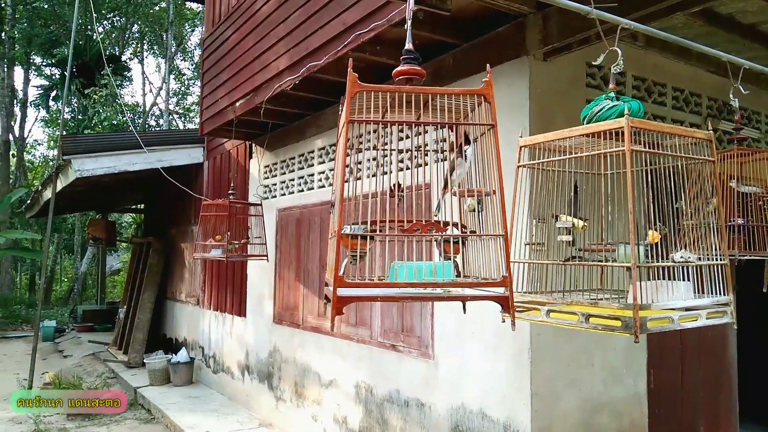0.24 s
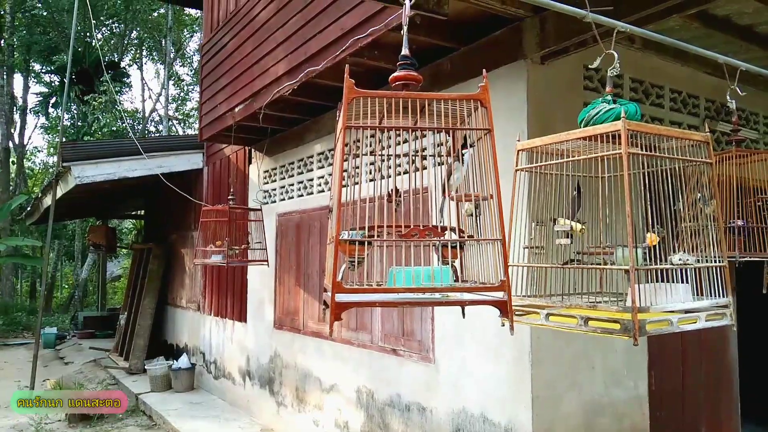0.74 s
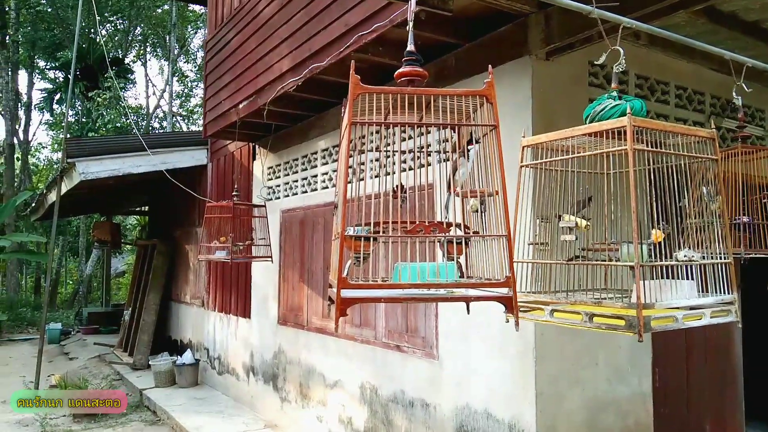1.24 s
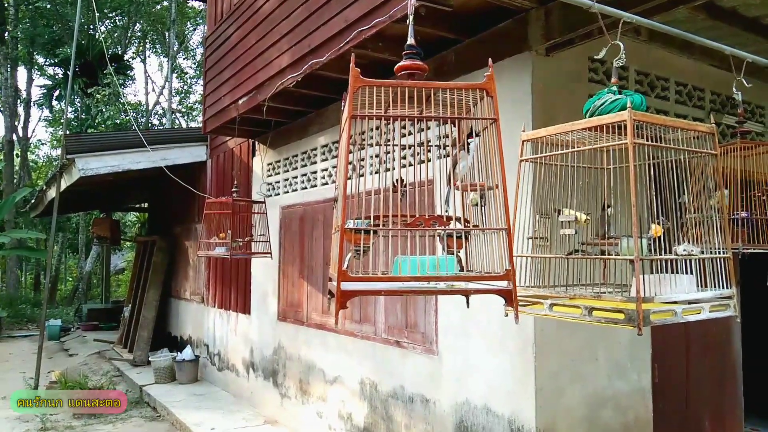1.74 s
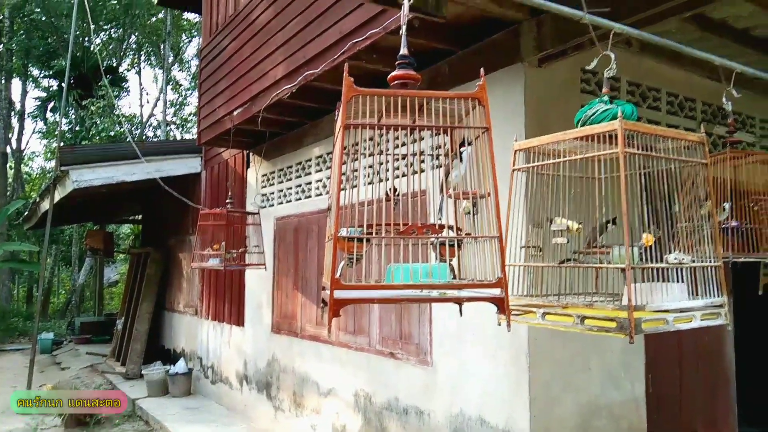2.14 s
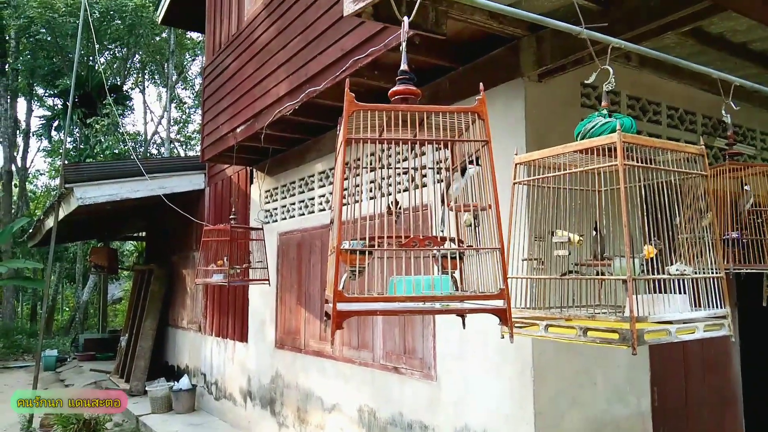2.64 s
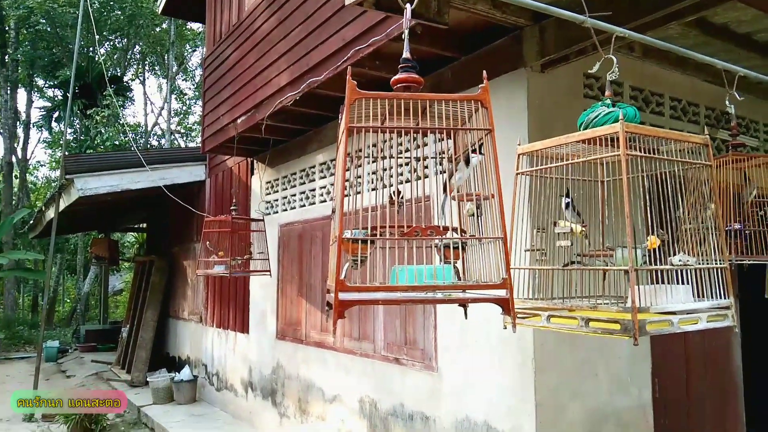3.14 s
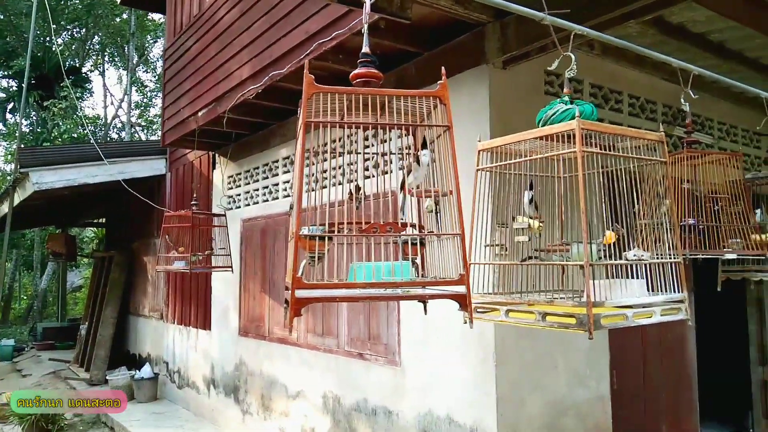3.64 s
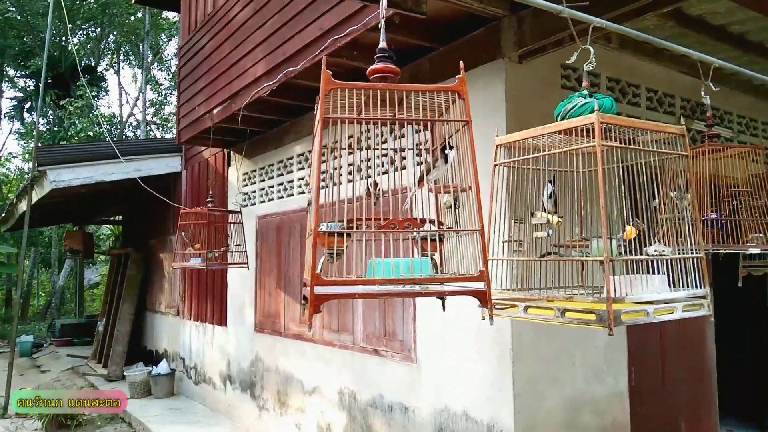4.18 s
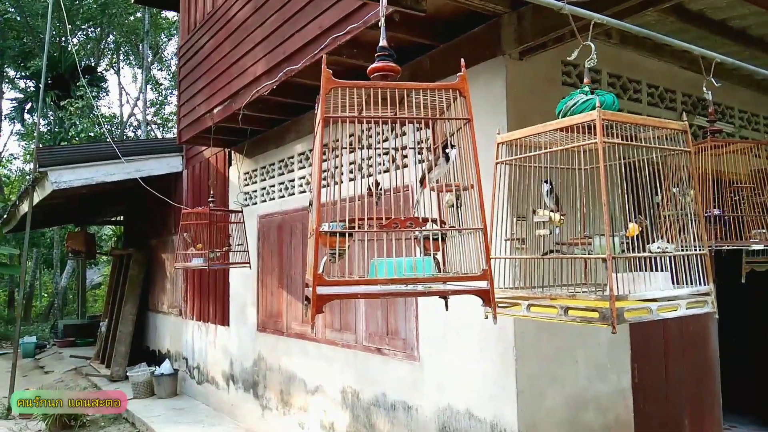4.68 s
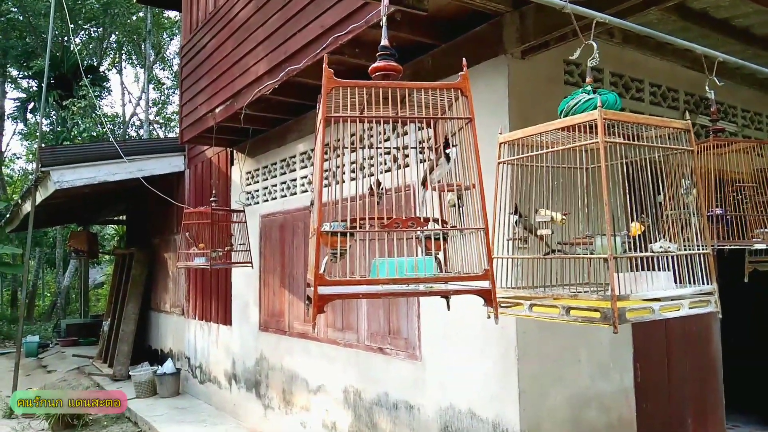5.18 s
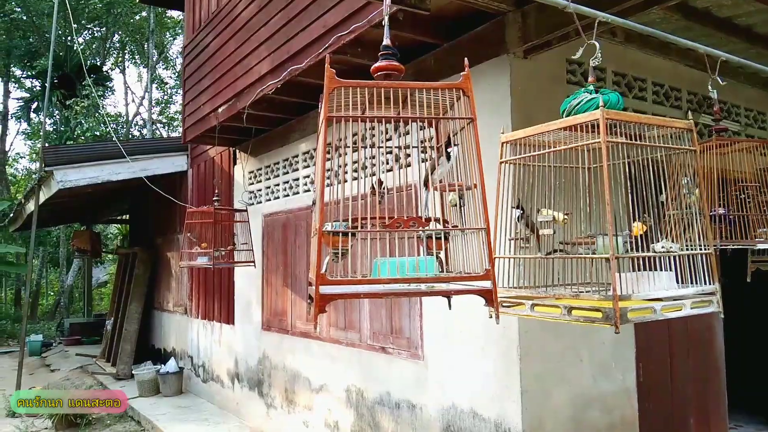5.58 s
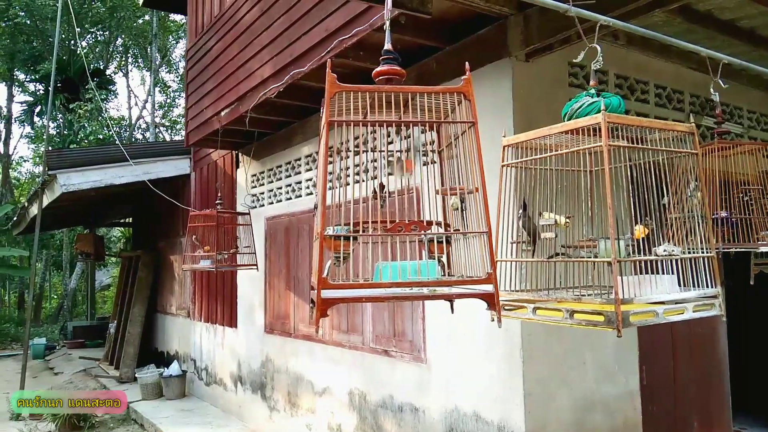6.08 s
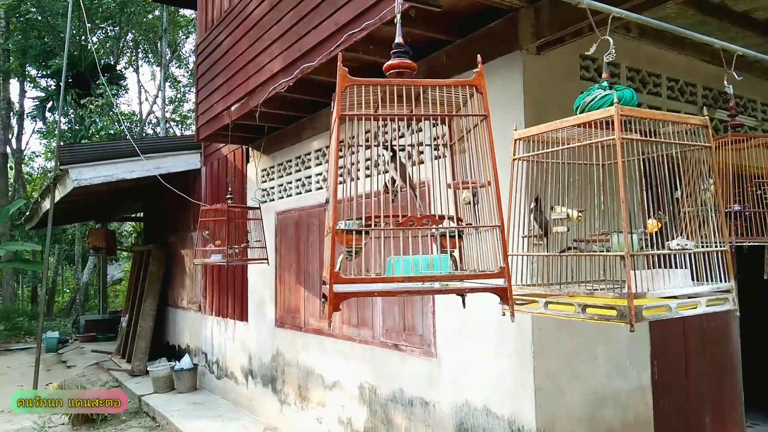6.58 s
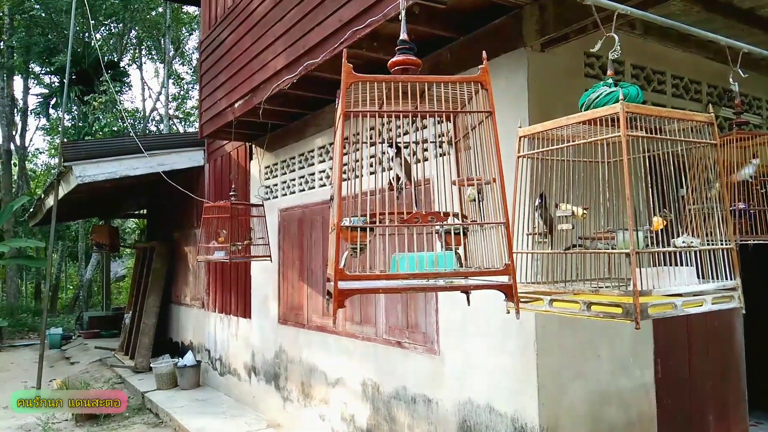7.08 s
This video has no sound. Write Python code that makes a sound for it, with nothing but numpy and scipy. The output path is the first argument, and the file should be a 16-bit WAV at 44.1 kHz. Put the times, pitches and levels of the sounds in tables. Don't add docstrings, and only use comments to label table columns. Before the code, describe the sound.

Bulbuls chatter in liquid whistles and short rasping chirps outdoors, over low traffic rumble that grows into the broad hiss of an approaching car.

```python
import sys
import numpy as np
from scipy import signal
from scipy.io import wavfile
from scipy.ndimage import uniform_filter1d

SR = 44100
rng = np.random.default_rng(int(sys.argv[2]) if len(sys.argv) > 2 else 0)


def master(y):
    cut = np.clip(np.atleast_2d(y).T, -1, 1)
    pcm = np.round(cut * 32767)
    wavfile.write(sys.argv[1], SR, pcm.astype(np.int16))


def gain_from_db(level_db):
    decades = np.asarray(level_db, float) / 20
    return 10 ** decades


N = 322812

# time_s, tyre_roar_db (its nearness), throttle_db, road_bumps_db, road_coarseness_db
CAR_APPROACH = [(0.0, -55.5, 0, -2, 3.5), (.9, -56.5, 3.5, -2, -5.5), (1.2, -57, 1.5, -4.5, -1.5),
                (1.6, -57.5, 1.5, -1, 18), (2.3, -52, 0, 2, 5.5), (3.1, -50, -2.5, -4, 9),
                (3.5, -49.5, -1.5, -5.5, 12.5), (4.0, -47.5, 3.5, 0.5, -2), (5.2, -42.5, 0, 2, 1),
                (5.6, -40, 1.5, 6, -5), (5.9, -38, 2.5, 4, -16), (6.24, -34, -5.5, -1.5, -8.5),
                (6.7, -30.5, 0, 0.5, -3.5), (7.32, -36.5, 0.5, -2.5, 0)]
# frequency_hz, level_db (per Hz)
THUD_COLOUR = [(15, -47), (25, -32.5), (74, -4.5), (125, 0), (160, -34), (280, -120)]
# frequency_hz, level_db (per Hz)
RUMBLE_COLOUR = [(74, -37.5), (125, 0), (204, 4.5), (275, -2.5), (330, -21), (430, -48.5), (730, -120)]
# frequency_hz, level_db (per Hz)
ROAR_COLOUR = [(180, -34), (300, -1.5), (365, -20.5), (398, 1), (511, -3), (625, 1), (930, -1.5),
               (1500, -22), (1950, -40), (3300, -120)]
# frequency_hz, level_db (per Hz)
HISS_COLOUR = [(760, -48), (1300, -5), (1770, -1.5), (2200, -9), (3200, 1), (3970, -3.5), (4890, -6.5),
               (5420, -11.5), (7950, -18.5), (9570, -17), (12000, -58.5), (15400, -54)]
# start_s, length_s, pitch_hz, level_db
FAR_WARBLE_NOTES = [(0.0, 0.1, 2650, -44.5), (0.0, 0.074, 2080, -53), (.24, 0.15, 3890, -56.5),
                    (.33, 0.21, 5500, -56.5), (.47, 0.037, 4330, -45.5), (.6, 0.039, 3950, -60),
                    (1.28, 0.19, 2110, -64), (1.43, 0.068, 3590, -60), (1.4, 0.065, 2900, -70),
                    (1.46, 0.046, 2450, -57), (1.29, 0.13, 2350, -70), (1.86, 0.092, 3640, -62),
                    (1.89, 0.083, 2373, -42), (2.26, 0.13, 2600, -40), (2.31, 0.23, 1843, -45),
                    (2.53, 0.08, 3600, -47), (2.5, 0.09, 4750, -62), (2.99, 0.035, 2000, -40),
                    (2.13, 0.1, 2700, -50), (6.29, 0.1, 2900, -42), (2.98, 0.027, 1663, -24.5),
                    (3.02, 0.048, 3910, -49), (3.23, 0.27, 5200, -64), (3.39, 0.024, 4500, -28.5),
                    (5.18, 0.068, 2120, -68.5), (7.03, 0.11, 3560, -43)]
# start_s, length_s, start_hz, end_hz, level_db
BUZZ_NOTES = [(.028, 0.04, 2564, 3272, -27.5), (.24, 0.046, 1850, 3090, -42.5),
              (.305, 0.067, 2145, 2484, -28.5), (.35, 0.045, 3254, 3462, -18),
              (.475, 0.041, 2990, 3092, -20), (.588, 0.016, 3260, 3290, -12.5),
              (.635, 0.054, 2160, 2200, -26.5), (1.724, 0.037, 2575, 3186, -22),
              (2.255, 0.077, 3360, 2990, -36), (4.468, 0.019, 2140, 2440, -19),
              (4.83, 0.046, 2930, 2976, -22.5), (4.85, 0.035, 3526, 3684, -20),
              (5.302, 0.094, 2832, 3696, -17.5), (5.568, 0.038, 2650, 3600, -21),
              (5.61, 0.047, 3534, 3200, -37), (5.61, 0.071, 3120, 1970, -24),
              (5.778, 0.084, 2335, 3478, -19.5), (5.83, 0.086, 3070, 3080, -31.5),
              (6.428, 0.025, 2850, 3550, -25), (6.445, 0.05, 3500, 3850, -20),
              (7.0, 0.057, 3250, 3575, -28.5)]
# start_s, length_s, pitch_hz, level_db
LEVEL_NOTES = [(1.36, 0.036, 2960, -41), (6.295, 0.02, 3350, -36), (1.895, 0.045, 2200, -44),
               (.048, 0.085, 3200, -35), (.275, 0.046, 2095, -32), (1.42, 0.023, 2036, -31),
               (4.382, 0.033, 3020, -29), (4.53, 0.019, 3080, -29), (4.705, 0.023, 3092, -28),
               (1.455, 0.024, 2034, -39.5), (2.1, 0.044, 3290, -52.5), (1.875, 0.067, 1922, -42),
               (2.038, 0.048, 2993, -38), (2.38, 0.12, 2200, -37.5), (2.778, 0.093, 2283, -32.5),
               (2.905, 0.013, 1560, -29.5), (3.04, 0.15, 2556, -43), (3.535, 0.079, 3240, -30),
               (3.655, 0.049, 1985, -29), (4.1, 0.016, 3550, -22), (4.25, 0.057, 3220, -31),
               (2.165, 0.069, 2567, -42), (1.915, 0.079, 2997, -34), (6.228, 0.037, 2538, -22)]
# start_s, length_s, pitch_hz, level_db
LIFTING_NOTES = [(.082, 0.045, 1615, -36), (.287, 0.044, 1844, -35.5), (.51, 0.074, 1590, -40.5),
                 (2.065, 0.046, 1550, -39.5), (2.445, 0.045, 1516, -38), (2.725, 0.013, 1550, -31),
                 (3.07, 0.035, 2045, -33.5), (3.095, 0.034, 1753, -29.5), (3.255, 0.043, 2636, -31),
                 (3.96, 0.028, 3300, -11), (4.205, 0.052, 1894, -21), (4.885, 0.032, 3624, -11.5),
                 (5.538, 0.04, 2400, -25)]
# start_s, length_s, pitch_hz, level_db
SETTLING_NOTES = [
    (.605, 0.027, 2716, -22),
    (3.272, 0.04, 2870, -25),
    (4.055, 0.047, 2890, -16.5),
    (6.145, 0.0333, 3344, -19.5),
    (6.212, 0.022, 2550, -30),
]
# start_s, length_s, pitch_hz, level_db
ARCHING_NOTES = [
    (6.172, 0.04, 3574, -24),
]
# start_s, length_s, start_hz, end_hz, level_db
SLIDE_NOTES = [(1.375, 0.07, 1464, 1920, -43.5), (1.358, 0.0337, 1680, 1470, -41.5),
               (1.39, 0.031, 3090, 3770, -56), (1.48, 0.015, 3740, 2060, -36),
               (2.08, 0.023, 3060, 3340, -49), (2.476, 0.012, 2840, 2180, -22),
               (3.92, 0.041, 3020, 3024, -17), (4.028, 0.025, 2805, 2490, -18.5),
               (4.042, 0.0198, 2650, 2260, -14.5), (4.812, 0.022, 2830, 4060, -28),
               (4.97, 0.04, 2490, 2697, -33), (5.015, 0.02, 2880, 3150, -32.5),
               (5.065, 0.047, 2485, 2870, -29.5), (5.161, 0.0091, 3200, 1970, -19),
               (5.24, 0.04, 2440, 2690, -31), (5.272, 0.017, 2810, 3200, -34),
               (6.03, 0.016, 2800, 4080, -22), (6.045, 0.0213, 3137, 2810, -12),
               (6.258, 0.0194, 3160, 2490, -18.5), (6.912, 0.0327, 2680, 3320, -38),
               (6.945, 0.05, 2640, 2704, -33), (6.985, 0.025, 2480, 2130, -41),
               (7.025, 0.028, 1940, 1960, -34), (4.17, 0.014, 2180, 1800, -31),
               (4.243, 0.026, 3700, 4300, -41), (4.44, 0.016, 1870, 1750, -34),
               (1.425, 0.055, 3550, 3650, -62), (1.475, 0.025, 1920, 1450, -40),
               (7.16, 0.021, 1450, 1560, -37)]
# start_s, length_s, start_hz, end_hz, level_db
HOOK_NOTES = [(6.127, 0.022, 3000, 3900, -27), (6.318, 0.036, 2250, 1900, -34),
              (4.66, 0.045, 1450, 2750, -36), (.566, 0.028, 1900, 2480, -34),
              (1.711, 0.07, 1836, 2900, -32), (3.245, 0.034, 2017, 2625, -25),
              (3.935, 0.02, 1350, 2100, -24), (2.461, 0.015, 2310, 2940, -18),
              (4.058, 0.034, 1610, 2277, -26), (4.14, 0.04, 1310, 2100, -22.5),
              (4.283, 0.03, 1600, 2247, -22.5), (4.211, 0.0343, 2824, 3230, -19.5),
              (4.317, 0.037, 2233, 2416, -18.5), (4.41, 0.041, 1350, 1810, -24.5),
              (5.219, 0.021, 2810, 3900, -35), (6.105, 0.022, 1930, 2304, -19)]
# start_s, length_s, start_hz, end_hz, level_db
TREE_NOTES = [(.14, 0.078, 4950, 5430, -74.5), (.74, 0.095, 6050, 5800, -80), (.85, 0.13, 5680, 5300, -76),
              (.96, 0.14, 5400, 5000, -68), (1.065, 0.16, 5120, 4740, -61.5), (1.19, 0.21, 4764, 4690, -66),
              (.945, 0.046, 4080, 4240, -72), (.99, 0.045, 3970, 3850, -75.5),
              (1.04, 0.036, 4300, 4200, -85), (1.06, 0.038, 3800, 3800, -75.5),
              (1.17, 0.056, 2180, 2190, -76), (.915, 0.037, 4920, 4880, -70), (.945, 0.11, 2670, 2740, -77),
              (1.21, 0.048, 6200, 6160, -69), (1.29, 0.04, 3860, 3760, -60),
              (1.48, 0.33, 5950, 4970, -61.5), (1.59, 0.12, 4100, 3300, -55),
              (1.8, 0.15, 5070, 5080, -53.5), (1.9, .07, 4450, 4670, -63), (1.95, .12, 4500, 6550, -54.5),
              (2.085, 0.07, 6750, 5100, -59.5), (2.2, 0.1, 5600, 5230, -63), (2.27, 0.15, 5170, 5250, -67),
              (2.41, 0.064, 4530, 4560, -70), (2.78, 0.11, 4190, 4480, -71), (2.47, 0.13, 5400, 5260, -70),
              (3.02, 0.07, 5300, 5170, -67.5)]
# start_s, length_s, start_hz, end_hz, level_db
WARBLE_NOTES = [(2.53, .052, 2440, 2056, -37), (4.497, 0.0305, 3850, 4300, -27),
                (2.486, .052, 2100, 2927, -33), (2.535, 0.07, 2800, 3200, -41),
                (4.49, 0.06, 2400, 1950, -35), (2.872, 0.055, 3020, 3040, -29.5),
                (2.995, 0.09, 2300, 3300, -38), (3.03, 0.046, 3540, 3600, -42.5),
                (3.345, .1, 2076, 3472, -25), (3.5, 0.0415, 2644, 3330, -30),
                (3.606, 0.042, 2003, 2504, -23.5), (3.705, 0.072, 2300, 3300, -33),
                (3.768, 0.1, 1480, 3450, -24), (3.95, 0.013, 2360, 2650, -5),
                (4.183, 0.021, 2346, 2350, -17)]
# start_s, length_s, middle_hz, top_hz, level_db
RASP_NOTES = [
    (4.333, 0.084, 2695, 3120, -28),
    (4.477, 0.09, 2483, 3110, -28),
    (4.656, 0.084, 2825, 2970, -28.5),
    (4.845, 0.061, 3314, 3560, -28.5),
]
# start_s, length_s, start_hz, end_hz, level_db
FAR_RASP_NOTES = [
    (4.96, 0.11, 1807, 2774, -49.5),
    (5.22, 0.091, 1755, 2730, -53),
    (6.365, .035, 1900, 2920, -48),
]
# time_s, pitch_hz, level_db
LONG_WHISTLE = [
    (5.039, 1432, -36),
    (5.053, 1663, -31.5),
    (5.079, 1687, -36),
    (5.09, 2140, -23),
    (5.109, 2223, -15.5),
    (5.118, 2093, -24.5),
    (5.126, 1770, -33),
    (5.137, 2104, -24.5),
    (5.158, 2240, -15.5),
]
# multiple (of the pitch), level_db
WHISTLE_OVERTONES = [(1, 0), (2, -24), (3, -34.5)]
# multiple (of the pitch), level_db
WARBLE_OVERTONES = [(1, 6), (2, -21.5), (3, -30.5), (4, -34)]
# multiple (of the pitch), level_db
BUZZ_OVERTONES = [(1, 0), (2, -24.5), (3, -37), (4, -38)]
# multiple (of the pitch), level_db
RASP_OVERTONES = [(1, -2.5), (2, 1.5), (3, -8.5), (4, -8)]
# frequency_hz, level_db
BEAK_COLOUR = [(1400, -13), (2200, -4), (3300, -0.5), (4400, -2.5), (6000, -10), (8000, -13), (11000, 4),
               (14000, -27.5)]
# frequency_hz, level_db
RASP_BEAK_COLOUR = [(1400, -22), (2300, -2.5), (3100, 6), (4300, 9), (5200, -2.5), (6500, -15.5),
                    (8000, -32.5), (11000, -13), (14000, -38)]
# time_s, overtone_db
SINGER_FACING = [(0, -2), (.45, 2.5), (.62, -1), (1.5, 5), (1.72, -12), (2.3, -8), (2.48, -11), (2.62, 5),
                 (2.9, 8), (3.25, -12), (3.42, 1.5), (3.62, -12.5), (3.75, 6.5), (3.96, -1.5), (4.2, 5),
                 (5.0, 2), (5.8, -2.5), (7.32, 5)]
# frequency_hz, fade_s (time to fall by 60 dB)
YARD_RING = [(1500, 0.49), (2200, 0.5), (3000, 0.74), (5000, 0.58), (8000, 0.18), (12000, 1)]


def in_time(rows):
    times_s, *columns = np.transpose(rows)
    return [np.interp(np.arange(N) / SR, times_s, column) for column in columns]


def at_hz(points, hz):
    table_hz, values = np.transpose(points)
    return np.interp(np.log(hz), np.log(table_hz), values)


def rms_one(x):
    return x / np.sqrt(np.mean(x ** 2) + 1e-20)


def filtered(x, order, hz, kind="low"):
    return signal.sosfilt(signal.butter(order, hz, kind, fs=SR, output="sos"), x)


def drift(rate_hz):
    lowpass = signal.butter(4, rate_hz, fs=SR / 20, output="sos")
    slow = signal.sosfilt(lowpass, rng.standard_normal(N // 20 + 2002))[2000:]
    return np.interp(np.arange(N) / 20, np.arange(len(slow)), rms_one(slow))


def shaped_noise(colour, patchy_db):
    white, out = rng.standard_normal((2, N)), np.zeros(N)
    low_hz, top_hz = colour[0][0], colour[-1][0]
    edges = np.geomspace(low_hz, top_hz, int(3 * np.log2(top_hz / low_hz)) + 2)
    for k, (low, high) in enumerate(zip(edges, edges[1:])):
        band = filtered(white[k % 2], 2, [low, high], "band")
        level_db = at_hz(colour, np.sqrt(low * high)) + patchy_db * drift(12.4)
        out += gain_from_db(level_db) * band
    return rms_one(out)


def road_thud(near_db, bumps_db):
    return gain_from_db(-49 + 0.18 * near_db + bumps_db) * shaped_noise(THUD_COLOUR, patchy_db=1.5)


def engine_rumble(near_db, throttle_db):
    return gain_from_db(-47.5 + 0.95 * near_db + throttle_db) * shaped_noise(RUMBLE_COLOUR, patchy_db=1.0)


def tyre_roar(roar_db, near_db, coarse_db):
    edge_hz = 1450
    tyres = shaped_noise(ROAR_COLOUR, patchy_db=1.14)
    edge = filtered(tyres, 4, edge_hz, "high")
    body = filtered(tyres, 6, edge_hz)
    edge_db = np.minimum(8 + 1.2 * near_db, 0) + coarse_db
    return gain_from_db(roar_db) * (body + gain_from_db(edge_db) * edge)


def tread_hiss(near_db):
    corner_s, corner_rise_s = 3.7, 0.023
    hidden = (1 - np.tanh((np.arange(N) / SR - corner_s) / corner_rise_s)) / 2
    shadow_db = -24.5 + 0.9 * near_db
    level_db = -47.5 + 0.29 * near_db + shadow_db * hidden
    hiss = shaped_noise(HISS_COLOUR, patchy_db=2.0)
    cancel = np.clip(0.9 - 0.04 * near_db + 0.25 * drift(3.0), 0, 1)
    hiss = hiss - cancel * signal.lfilter(*signal.iirpeak(4800, 12.0, SR), hiss)
    hiss = filtered(hiss, 6, 11000)
    body = signal.sosfiltfilt(signal.butter(2, 7000, fs=SR, output="sos"), hiss)
    shine = gain_from_db(0.68 * (near_db - 23.0)) * (hiss - body)
    return gain_from_db(level_db) * (body + shine)


def road():
    roar_db, throttle_db, bumps_db, coarse_db = in_time(CAR_APPROACH)
    near_db = roar_db + 45
    low = road_thud(near_db, bumps_db) + engine_rumble(near_db, throttle_db)
    return low + tyre_roar(roar_db, near_db, coarse_db) + tread_hiss(near_db)


def held(rows, start_ratio, end_ratio):
    return [(s, length, start_ratio * hz, hz, end_ratio * hz, db) for s, length, hz, db in rows]


def glided(rows, bend):
    return [(s, length, start, start + bend * (end - start), end, db) for s, length, start, end, db in rows]


def sing(notes, tones, beak, warble_hz, warble_depth, rough, rise_s, fall_s, late, breath_db, throb_db, dull=1):
    out = np.zeros(N)
    tremble, flutter, waver = drift(230), np.tanh(drift(310)), np.tanh(drift(36.0))
    facing_db, = in_time(SINGER_FACING)
    air = rms_one(filtered(rng.standard_normal(N), 4, [8600, 12700], "band"))
    for (s, length, start, middle, end, level_db), phase in zip(notes, rng.random(len(notes))):
        at = round(s * SR)
        t = np.arange(min(round(length * SR), N - at)) / SR
        u = t / length
        span = slice(at, at + len(t))
        arc = 2 * start * (u - .5) * (u - 1) - 4 * middle * u * (u - 1) + 2 * end * u * (u - .5)
        turn = 2 * np.pi * (warble_hz * t + phase)
        wobble = np.sin(turn) * np.minimum(0.71 + u, 1)
        hz = arc * (1 + warble_depth * wobble + rough * tremble[span])
        cycles = 2 * np.pi * np.cumsum(hz) / SR
        off_db = dull * max(-17.5 - level_db, 0)
        fade = np.clip(t / rise_s, 0, 1) * np.clip((length - t) / fall_s, 0, 1)
        swell = np.sin(np.pi / 2 * fade) ** 2 * gain_from_db(level_db + 150 * rough * flutter[span])
        swell *= gain_from_db(throb_db * np.minimum(0.47 + u, 1) * np.cos(turn - 1.2))
        swell *= gain_from_db(0.22 * off_db * waver[span])
        swell *= gain_from_db(4 * (u - .5))
        overtone_db = min(dull * 2, 1) * facing_db[span] - 0.39 * off_db
        tone = 0
        for k, db in tones:
            tone_db = db + overtone_db * (k > 1) + at_hz(beak, k * hz)
            opening = u ** (late * (k > 1))
            tone = tone + gain_from_db(tone_db) * np.sin(k * cycles) * opening
        out[span] += swell * (tone + gain_from_db(breath_db) * u * air[span])
    return out


def far_warbles():
    return sing(held(FAR_WARBLE_NOTES, .94, .99), [(1, 0)], BEAK_COLOUR, 100, .055, .02,
                rise_s=.02, fall_s=.02, late=0, breath_db=-90, throb_db=2.5, dull=.2)


def buzzes():
    return sing(glided(BUZZ_NOTES, .7), BUZZ_OVERTONES, BEAK_COLOUR, 195.3, 0.058, 0.013,
                rise_s=0.0071, fall_s=0.02, late=0.54, breath_db=-73.5, throb_db=2.5)


def clear_whistles():
    steady = held(LEVEL_NOTES, .98, .99) + held(LIFTING_NOTES, .94, 1.07)
    curved = held(SETTLING_NOTES, 1.13, 1.01) + held(ARCHING_NOTES, .85, .86)
    moving = glided(SLIDE_NOTES, .5) + glided(HOOK_NOTES, .87)
    return sing(steady + curved + moving, WHISTLE_OVERTONES, BEAK_COLOUR, 90, .012, .011,
                rise_s=.007, fall_s=.006, late=1.2, breath_db=-60, throb_db=1.5)


def tree_whistles():
    return sing(glided(TREE_NOTES, .5), [(1, 0)], BEAK_COLOUR, 40, .004, .006,
                rise_s=.04, fall_s=.02, late=0, breath_db=-90, throb_db=.2, dull=.12)


def warbles():
    return sing(glided(WARBLE_NOTES, .8), WARBLE_OVERTONES, BEAK_COLOUR, 100.34, 0.055, 0.028,
                rise_s=0.0088, fall_s=0.017, late=0.52, breath_db=-47.5, throb_db=5.0)


def rasps():
    sweeps = [(s, length, 0.4 * top, hz, top, db) for s, length, hz, top, db in RASP_NOTES]
    drop_s = .016
    drops = [(s + length - drop_s / 2, drop_s, 0.98 * top, db + 1) for s, length, hz, top, db in RASP_NOTES[:3]]
    return sing(sweeps + held(drops, 1.3, .62), RASP_OVERTONES, RASP_BEAK_COLOUR, 133.3, .07, 0.025,
                rise_s=0.013, fall_s=0.017, late=0, breath_db=-21.5, throb_db=0.5, dull=0)


def far_rasps():
    return sing(glided(FAR_RASP_NOTES, .68), RASP_OVERTONES, RASP_BEAK_COLOUR, 127.0, 0.072, 0.031,
                rise_s=0.031, fall_s=0.0065, late=0, breath_db=-14.0, throb_db=7.5, dull=0)


def long_whistle():
    hz, level_db = in_time(LONG_WHISTLE)
    t = np.arange(N) / SR
    inside_s = np.minimum(t - LONG_WHISTLE[0][0], LONG_WHISTLE[-1][0] - t)
    edges = np.clip(inside_s / 0.0037, 0, 1)
    cycles = 2 * np.pi * np.cumsum(uniform_filter1d(hz, size=300)) / SR
    return edges * gain_from_db(level_db - 1.5) * (np.sin(cycles) + gain_from_db(-33) * np.sin(2 * cycles))


def scatter(x, fade_s_at, gap_s):
    t, tail = np.arange(SR) / SR, np.zeros(SR)
    edges = np.geomspace(1000, 16000, 9)
    for low, high in zip(edges, edges[1:]):
        band = filtered(rng.standard_normal(SR), 2, [low, high], "band")
        fade_s = fade_s_at(np.sqrt(low * high))
        tail += band * gain_from_db(-60 * t / fade_s - 47 * t ** 2)
    tail *= np.clip(t / gap_s, 0, 1)
    return signal.fftconvolve(x, tail / np.sqrt(np.sum(tail ** 2)))[:N]


def wall_echo(sound):
    return scatter(gain_from_db(-2.5) * sound, lambda hz: 0.16, gap_s=0.0021)


def yard_share(near):
    power = np.abs(uniform_filter1d(near ** 2, size=round(0.11 * SR)))
    loud_db = 10 * np.log10(power + gain_from_db(-105))
    return gain_from_db(-7.5 - 0.2 * (loud_db + 35))


def yard_echo(sound):
    tail = scatter(sound, lambda hz: at_hz(YARD_RING, hz), gap_s=0.016)
    return tail * gain_from_db(0.8 * drift(30.0))


def birds():
    far = far_warbles()
    near_buzzes = buzzes()
    whistles = clear_whistles()
    thin = tree_whistles()
    near_warbles = warbles()
    near_rasps = rasps()
    far = far + far_rasps()
    phrase = long_whistle()
    whistles = whistles + phrase
    near = whistles + near_warbles + near_buzzes + near_rasps
    to_wall = near - 0.55 * whistles - 0.55 * near_rasps
    to_yard = near - 0.25 * whistles - 0.275 * near_rasps - 0.6 * phrase
    echoes = wall_echo(to_wall) + yard_echo(yard_share(near) * to_yard + gain_from_db(5.5) * thin + far)
    return gain_from_db(-2.2) * near + gain_from_db(7.5) * thin + gain_from_db(-1.0) * far + echoes


def scene():
    return (road() + birds())[None]


def band_limit(x):
    return signal.sosfilt(signal.butter(12, 15560, fs=SR, output="sos"), x)


def record(dry):
    bent = dry - 0.07 * dry ** 3 + .01 * dry ** 2
    dipped = bent - 0.24 * signal.lfilter(*signal.iirpeak(7960, 5.0, SR), bent)
    dulled = filtered(dipped, 6, 12900)
    top_hiss = gain_from_db(-83) * filtered(rng.standard_normal(dry.shape), 4, 13200, "high")
    treble_hiss = gain_from_db(-101.0) * filtered(rng.standard_normal(dry.shape), 2, 6000, "high")
    return band_limit(dulled + top_hiss + treble_hiss)


dry = scene()
out = record(dry)
master(out)
```